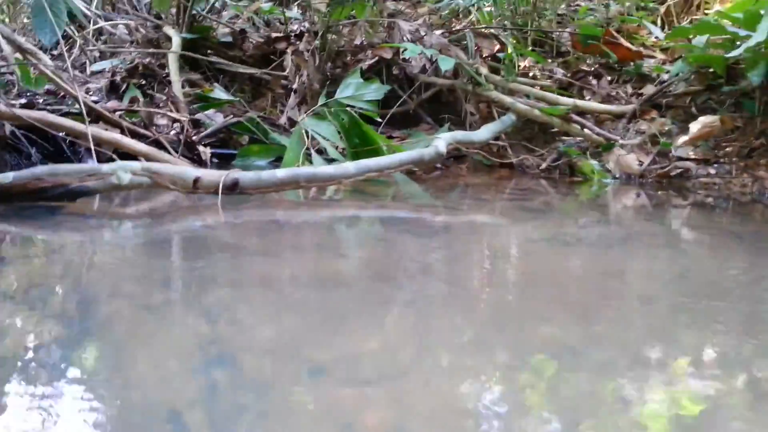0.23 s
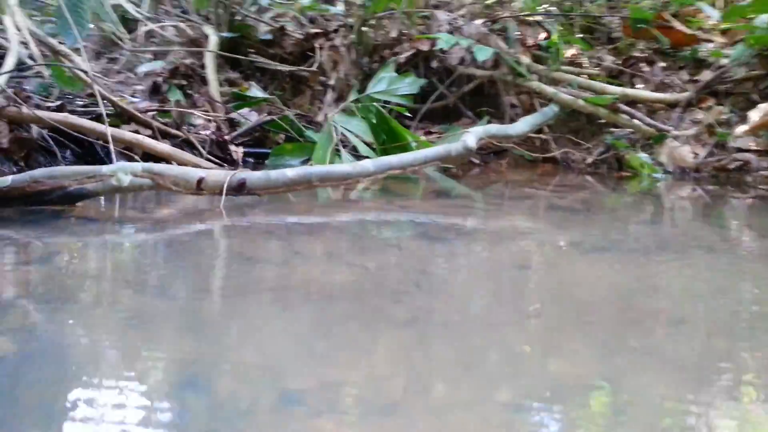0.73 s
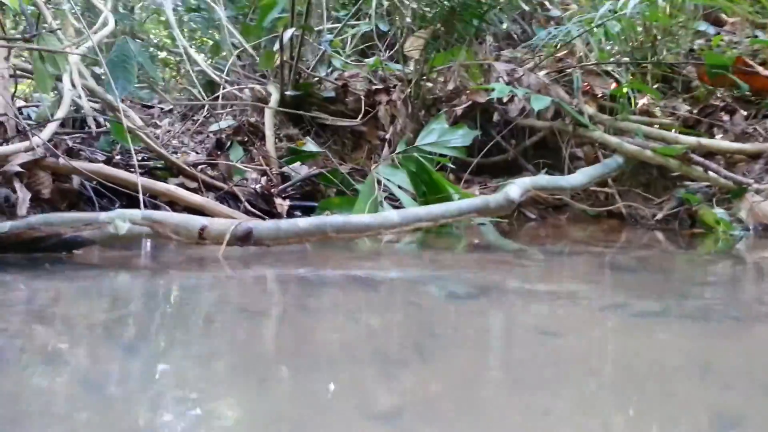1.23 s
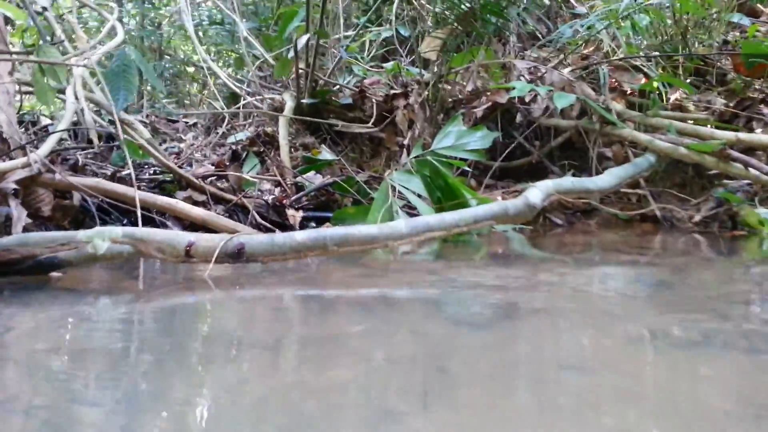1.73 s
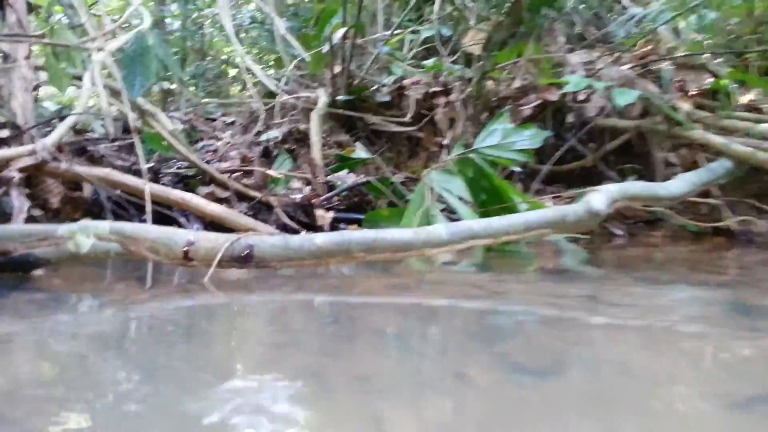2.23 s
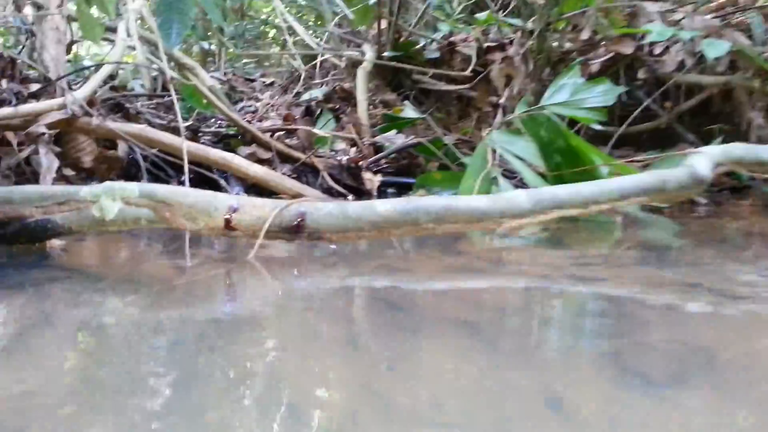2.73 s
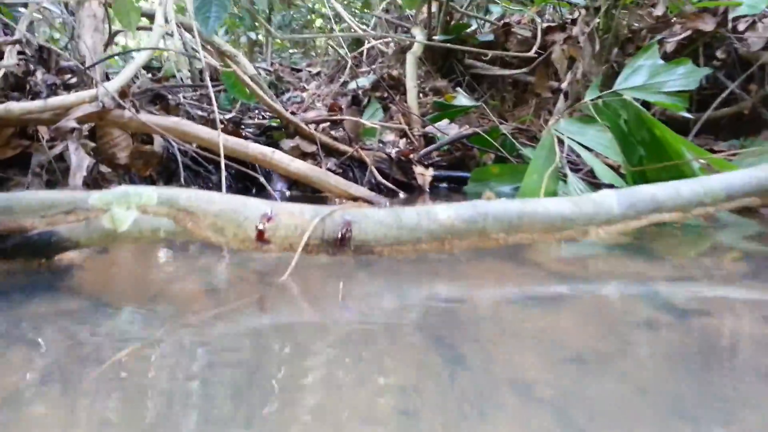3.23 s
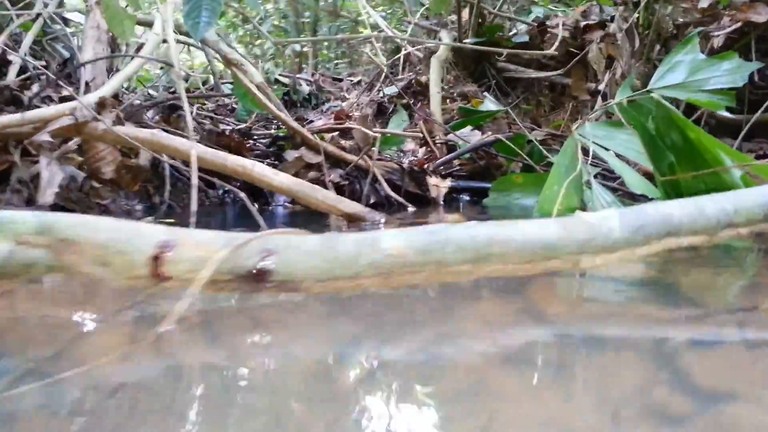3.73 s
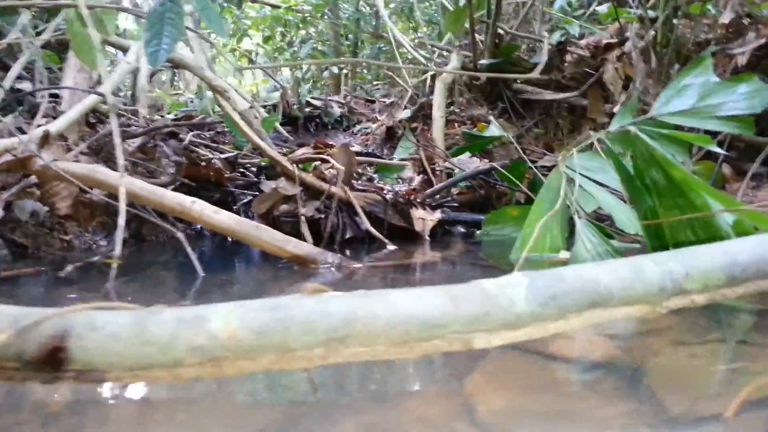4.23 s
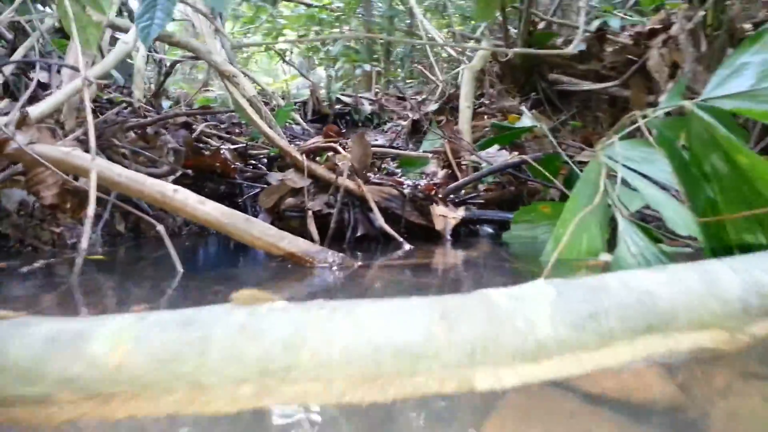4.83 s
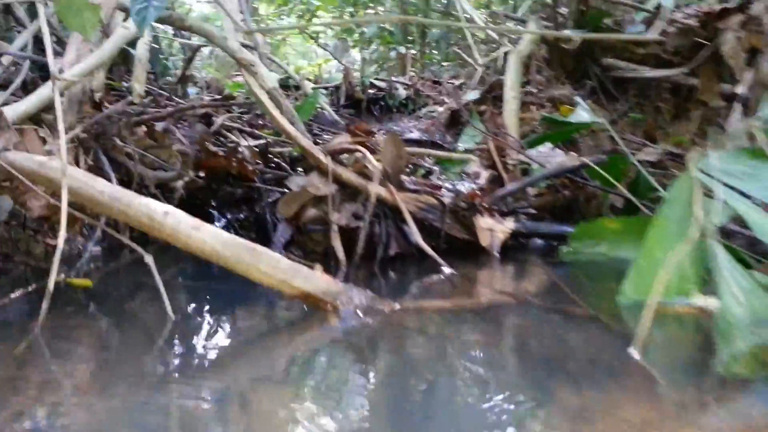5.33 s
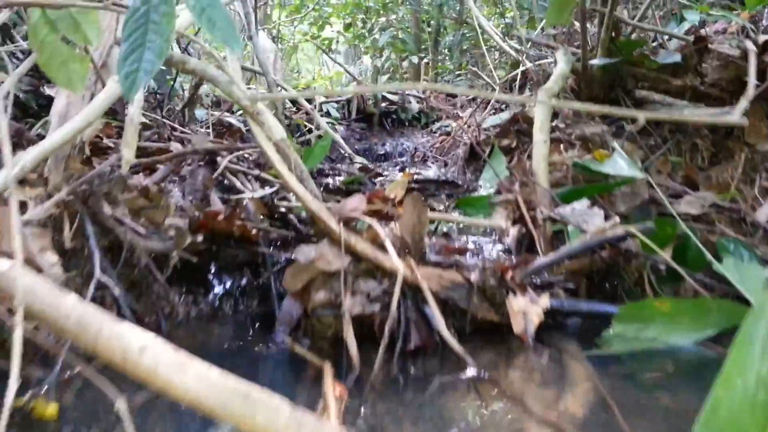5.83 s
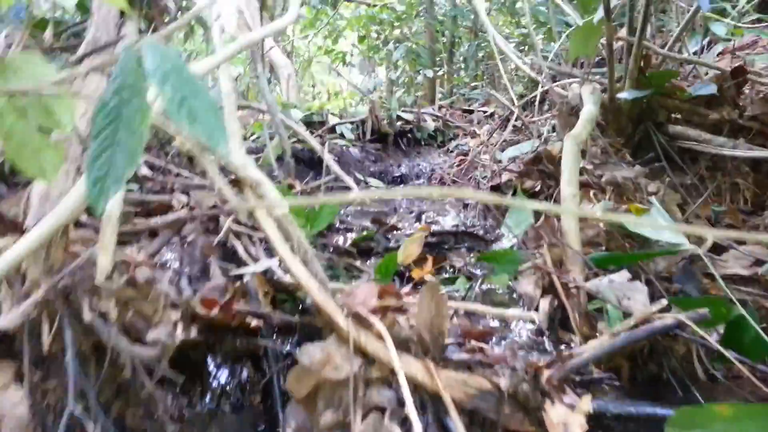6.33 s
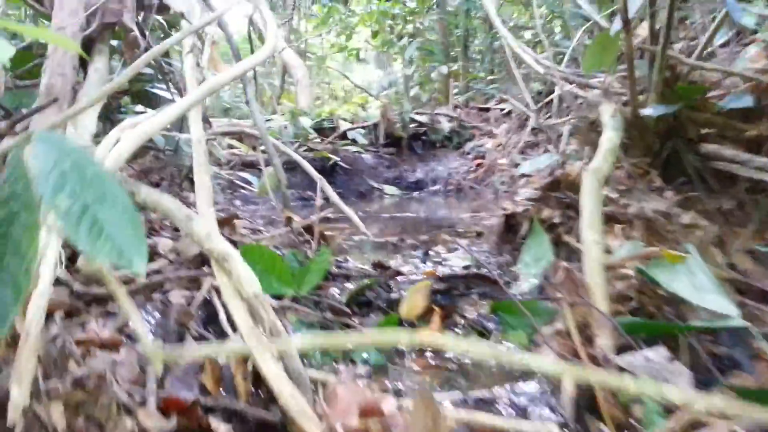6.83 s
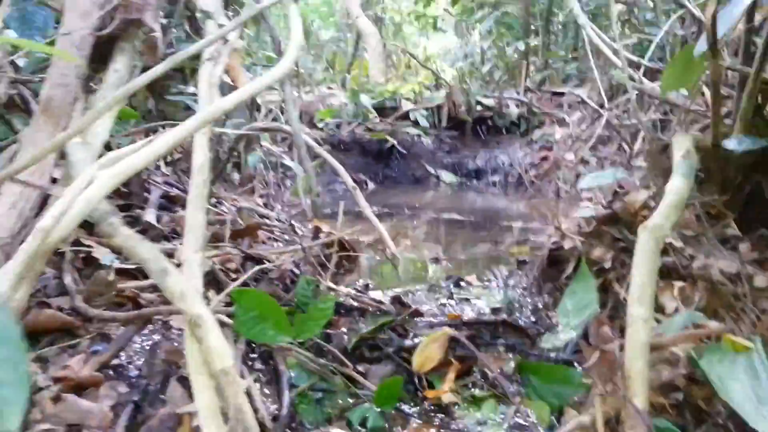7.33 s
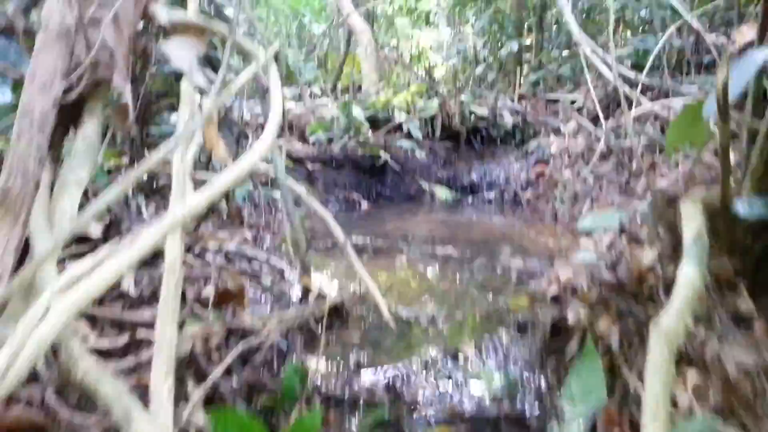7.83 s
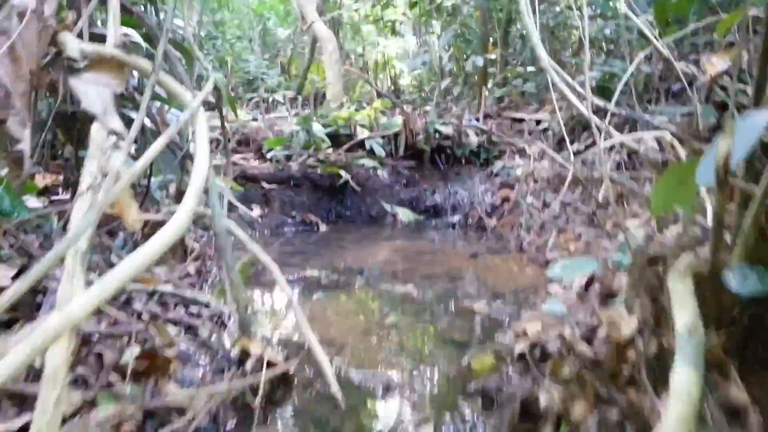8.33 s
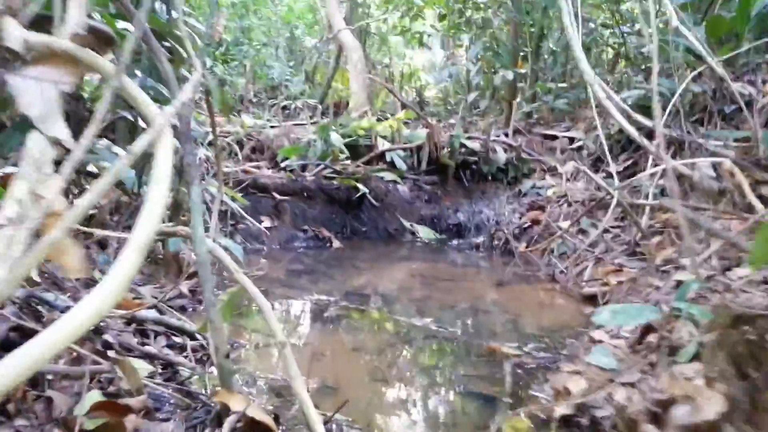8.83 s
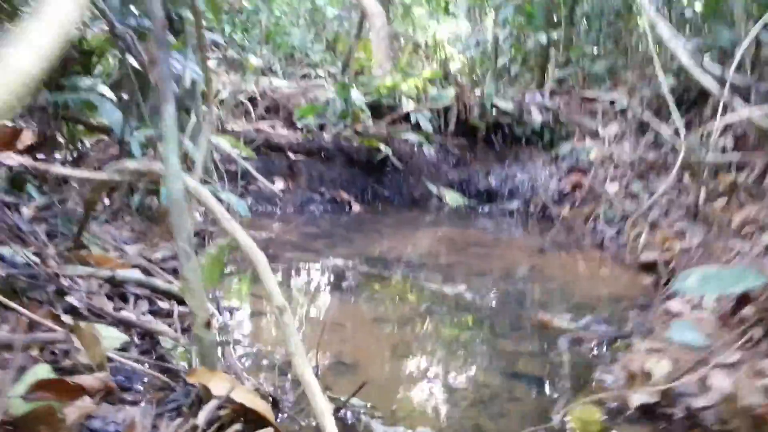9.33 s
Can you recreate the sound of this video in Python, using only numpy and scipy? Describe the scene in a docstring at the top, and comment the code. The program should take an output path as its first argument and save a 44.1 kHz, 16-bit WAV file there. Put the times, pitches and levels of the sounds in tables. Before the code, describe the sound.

Slow wading stirs a shallow forest stream, bubbling gurgles and spattering drops over a thin trickle, calming midway, then growing busier and brighter.

```python
"""A shallow forest stream, stirred about every second and a half as if by slow wading, close to the microphone.
Each stir surges over the steady trickle as a cloud of ringing bubbles with noisy churn, then spray patters back.
Single bubbles plop as gliding rings, drops tick with short bursts, an insect chirps high up in narrow noise.
Soft low knocks, rumble and faint hiss lie beneath.
The right microphone port is open and rings in the treble; the left one is muffled."""
import sys
import numpy as np
from scipy import signal
from scipy.io import wavfile
from scipy.ndimage import uniform_filter1d

SR = 44100
rng = np.random.default_rng(int(sys.argv[2]) if len(sys.argv) > 2 else 0)


def to_wav(s):
    """Save 16-bit WAV."""
    ch = np.atleast_2d(s).T  # columns
    pcm = np.round(np.clip(ch, -1, 1) * 32767)  # PCM
    wavfile.write(sys.argv[1], SR, pcm.astype(np.int16))


N = 423360
TIME = np.arange(N) / SR

# Faint hiss under everything. Each row: time in seconds, level in dB.
HISS_LEVEL = [(0, -65), (2.7, -69), (3.15, -64), (3.6, -69), (4.3, -70.5), (4.65, -63.5), (4.9, -67),
              (5.7, -67), (8.1, -64), (9.6, -61)]
# Tilt of the rumble, the hiss and the spray. Each row: frequency in Hz, relative density in dB per Hz.
RUMBLE_SPECTRUM = [(20, -7), (42, -10), (57, 9.5), (80, 4.5), (120, -1), (220, -4.5), (400, -6),
                   (900, -16.5), (2500, -35)]
HISS_SPECTRUM = [(100, 5.5), (1000, 2.5), (3000, -3.5), (8000, 2), (11000, 1.5), (15000, -3.5)]
SPRAY_SPECTRUM = [(150, -26.5), (600, -3.5), (1500, -4), (2400, -5.5), (3200, -6), (4200, -4), (6000, -3),
                  (9000, -5.5), (11000, -5.5), (14500, -4.5)]
# Responses of the right and the left microphone port. Each row: frequency in Hz, gain in dB.
OPEN_PORT_RESPONSE = [(20, 9), (55, 5), (200, 3), (600, 2), (2000, 5.5), (4500, 7.5), (5800, 9.5),
                      (6700, 14.5), (7500, 20.5), (8200, 18.5), (9000, 12.5), (10000, 8), (15000, -2.5)]
MUFFLED_PORT_RESPONSE = [(20, -45), (55, -7), (200, -0.5), (400, -1.5), (700, -7.5), (1300, -7.5),
                         (2400, -12.5), (3300, -14.5), (5000, -22.5), (8000, -13), (15000, -30)]
# Soft low knocks. Each row: start in seconds, relative peak level in dB, pitch in Hz.
KNOCKS = [(6.614, -53.5, 142), (8.079, -37.5, 91.5), (8.147, -48, 152), (8.292, -42.5, 88),
          (8.35, -63, 111)]
# Bouts of insect chirps. Each row: start in seconds, end in seconds, seconds from chirp to chirp,
# first top pitch in Hz, last top pitch in Hz, relative level in dB.
CHIRP_BOUTS = [(.064, 2.9, .226, 8760, 8510, -57.5), (6.072, 8.5, .208, 8450, 8480, -55.5)]
# Drops that smack the water or the leaves. Each row: start in seconds, relative peak level in dB,
# relative weight of the low thud against the tick in dB.
DROP_HITS = [(0.098, -23, -12), (0.1095, -33, -4.5), (0.2949, -32, 0), (0.4194, -30.5, -10),
             (0.46, -31, -11.5), (0.6416, -32, -15), (0.6797, -25.5, -11), (0.847, -43, 3),
             (1.832, -29.5, -26), (1.872, -30.5, -30), (2.5278, -34.5, -35), (4.558, -32, -31),
             (5.4091, -41.5, -4), (5.7654, -24.5, -32), (6.337, -34, -33), (6.519, -27.5, -43),
             (7.544, -29, -25), (7.6929, -20.5, -11.5), (7.9945, -24, -24), (8.3142, -26.5, -29),
             (8.6257, -29, -12), (8.6652, -23.5, -17), (8.759, -41, -30), (8.781, -31, -28),
             (8.8495, -21.5, -8), (8.9803, -37, 1.5), (9.0171, -15, -32.5), (9.5914, -17.5, -13)]
# Single near bubbles. Each row: start in seconds, relative peak level in dB, nominal pitch in Hz,
# nominal ring time to -60 dB in seconds.
NEAR_BUBBLES = [(.278, -8.5, 252, 0.012), (.279, -31, 2130, 0.011), (.328, -33.5, 1090, 0.022),
                (.403, -24, 3360, 0.003), (.429, -28, 1070, 0.01), (.44, -31.5, 223, 0.069),
                (.676, -29.5, 1800, 0.01), (.713, -27.5, 563, 0.027), (.722, -26.5, 1470, 0.0095),
                (.816, -26, 448, 0.041), (.847, -19.5, 875, 0.011), (.967, -31, 1420, 0.019),
                (.975, -43, 360, .08), (1.442, -39.5, 2700, 0.022), (1.57, -27, 937, 0.044),
                (1.871, -31, 1870, 0.0088), (1.872, -43, 534, 0.068), (2.045, -41, 1740, 0.031),
                (3.031, -35, 930, 0.066), (3.192, -44, 1285, 0.044), (3.377, -42, 322, 0.025),
                (3.717, -42.5, 2250, 0.01), (3.789, -47, 1020, 0.027), (3.985, -52.5, 874, 0.099),
                (4.437, -42.5, 1640, 0.039), (4.555, -37, 845, 0.054), (4.777, -34, 4200, 0.017),
                (5.408, -42, 1980, 0.01), (5.695, -34, 1280, 0.019), (5.752, -29, 854, 0.017),
                (5.867, -24, 1210, 0.014), (6.152, -33, 985, 0.089), (6.302, -24.5, 1980, 0.016),
                (6.475, -42, 1460, 0.031), (7.417, -44, 1900, 0.044), (7.477, -33, 1126, 0.039),
                (7.521, -27.5, 736, 0.018), (7.629, -23, 580, 0.023), (7.658, -28.5, 662, 0.07),
                (7.728, -32.5, 840, .052), (7.739, -24, 1910, 0.0079), (7.781, -29.5, 535, 0.077),
                (8.044, -23, 2080, 0.0062), (8.061, -33.5, 990, 0.022), (8.114, -18.5, 3180, 0.0078),
                (8.827, -4.5, 930, 0.004), (8.981, -27.5, 4400, 0.008)]
# Steady trickle, loudest at the end as it comes nearer.
# Each row: time in seconds, relative bubbling level in dB, relative fine spray level in dB.
TRICKLE_LEVELS = [(0, -73.5, -62.5), (1.2, -77.5, -59.5), (2.3, -72, -61.5), (2.75, -81.5, -67.5),
                  (4.4, -75.5, -67), (5.4, -74.5, -60), (6.3, -75, -55.5), (7.3, -69.5, -52),
                  (8.4, -68.5, -52), (9.6, -58.5, -50)]
# Gurgle pitch of the trickle. Each row: time in seconds, pitch in Hz.
TRICKLE_PITCH = [(0, 610), (5.4, 686), (7.3, 1084), (9.6, 1466)]
# Surges of stirred water. Each row: start in seconds, swell in seconds, hold in seconds,
# relative bubbling level in dB, relative spray level in dB, gurgle pitch at the height in Hz.
STIR_SURGES = [(0.257, 0.02, 0.014, -45.5, -50, 374), (0.352, 0.052, 0.034, -53.5, -48, 334),
               (0.523, .14, .07, -46, -48, 502), (0.774, 0.066, 0.026, -41.5, -46.5, 419),
               (.92, 0.036, 0.026, -51, -49.5, 359), (1.377, 0.18, 0.023, -54, -59, 567),
               (1.777, 0.061, 0.032, -60, -69, 542), (1.924, 0.026, 0.035, -62.5, -50.5, 970),
               (2.879, 0.06, 0.13, -59.5, -56, 830), (3.147, 0.04, 0.049, -57, -54, 834),
               (3.273, 0.064, 0.064, -60, -56, 312), (3.611, .05, 0.12, -68, -60.5, 345),
               (3.926, 0.065, 0.029, -70.5, -63, 323), (4.391, 0.17, .26, -56.5, -52.5, 757),
               (5.538, 0.13, 0.21, -48.5, -48.5, 545), (5.889, 0.0813, 0.2, -53.5, -49.5, 710),
               (6.236, 0.044, 0.082, -60.5, -55, 1230), (7.38, 0.081, 0.066, -52, -52.5, 855),
               (7.52, 0.095, 0.18, -42, -43, 551), (7.798, 0.082, 0.029, -46, -38.5, 605),
               (7.937, 0.13, 0.071, -49.5, -36.5, 1716), (8.147, 0.052, 0.15, -63, -43.5, 1500),
               (8.447, 0.15, .25, -50.5, -41, 731), (8.921, 0.046, 0.052, -51.5, -49.5, 842),
               (9.308, 0.22, .05, -53, -46.5, 1260)]
# Brief showers of fine spray. Each row: start in seconds, length in seconds, relative level in dB.
SPRAY_SHOWERS = [(0.996, 0.19, -61), (1.213, 0.44, -68), (1.688, 0.13, -57.5), (2.138, 0.19, -60.5),
                 (2.336, 0.14, -56.5), (2.488, 0.22, -57), (2.79, 0.11, -59.5), (3.076, 0.074, -54),
                 (3.972, 0.059, -55), (4.132, 0.089, -55.5), (4.282, 0.046, -54.5), (4.966, 0.16, -55.5),
                 (5.142, 0.19, -58.5), (5.34, 0.1, -56.5), (6.49, 0.094, -53), (7.648, 0.21, -38),
                 (9.101, 0.13, -45)]

EDGE_HZ = 14750  # upper band limit
RUMBLE_DB, RUMBLE_PER_DB = -44.5, 0.43  # the rumble follows the bubbling, more weakly
CHIRP_S = 0.167  # length of one chirp
DROP_HZ, DROP_SPREAD_OCTAVES = 7430, 0.072  # the tiny bubble that a drop traps
SWELL_DB, SETTLE_DB_PER_S, SPRAY_SETTLE_DB_PER_S = 14, 167.5, 138  # the spray lingers after the bubbling
DEEPEN_OCTAVES_PER_DB = 0.15  # a surge gurgles lowest at its height


def amp(db):
    """Turns decibels into gain."""
    return 10 ** (np.asarray(db) / 20)


def unit(x):
    """Scales a sound to rms 1."""
    return x / np.sqrt(np.mean(x ** 2) + 1e-20)


def follow(rows, column=1):
    """Draws one column of a curve at every sample."""
    rows = np.asarray(rows)
    return np.interp(TIME, rows[:, 0], rows[:, column])


def add(mix, start_s, sound):
    """Mixes a sound in at its start time, cut off at the end of the scene."""
    part = mix[max(round(start_s * SR), 0):][:len(sound)]
    part += sound[:len(part)]


def colour(x, points):
    """Filters with a (Hz, dB) response, in minimum phase so that nothing sounds early."""
    hz, db = np.transpose(points)
    bins_hz = abs(np.fft.fftfreq(8192, 1 / SR))
    log_gain = np.log(amp(np.interp(np.log(bins_hz + 1), np.log(hz), db)))
    response = np.exp(np.conj(signal.hilbert(log_gain)))
    taps = np.fft.ifft(response).real[:4096]
    return signal.oaconvolve(x, taps)[:len(x)]


def steadied(x, seconds):
    """Holds the slow level of a stream of grains near 1 and leaves the single grains standing out."""
    size = int(seconds * SR)
    power = uniform_filter1d(uniform_filter1d(x ** 2, size), size)
    return x / np.sqrt(abs(power) + 1e-9)


def resonate(x, hz, width_hz):
    """A resonance that follows the curve hz: shift it down to zero, smooth, and shift back up."""
    turn = np.exp(2j * np.pi * np.cumsum(hz) / SR)
    r = np.exp(-np.pi * width_hz / SR)
    smooth = signal.lfilter([1 - r], [1, -r], x / turn + 1e-18)
    return 2 * (turn * smooth).real


def bubble(hz, t60, rise):
    """A pocket of air swells into a ring within a cycle or two and dies; its pitch glides by the share rise."""
    t = np.arange(int(t60 * SR)) / SR
    turns = hz * (t + rise * t ** 2 / (2 * t60))
    swell = 1 - np.exp(-(hz * t) ** 2)
    return np.sin(2 * np.pi * turns) * swell * np.exp(-np.log(1000) * t / t60)


def splashes(per_s, size_db, decay_s, base):
    """Envelope of tiny splashes: each starts at once and dies away, over a steady base."""
    chance, size = rng.random((2, N))
    energy = (chance < per_s / SR) * amp(size_db * np.minimum(-np.log(1 - size), 3)) ** 2
    power = signal.lfilter([1], [1, -np.exp(-1 / (decay_s * SR))], energy)
    return np.sqrt(power / power.mean() + base)


def bed(spectrum, level_db, shared):
    """Soft noise on a level curve; the power share `shared` is alike at both ports."""
    common, left, right = (unit(colour(rng.standard_normal(N), spectrum)) for _ in range(3))
    noise = np.sqrt(shared) * common + np.sqrt(1 - shared) * np.array([left, right])
    return noise * amp(level_db)


def bumps(t60=0.08):
    """Dull low knocks, felt at both ports, each a short ring of fixed pitch."""
    out = np.zeros(N)
    for start_s, db, hz in KNOCKS:
        add(out, start_s, amp(db) * bubble(hz, t60, 0))
    return out


def insect(level_db=-12.5, arch_hz=110):
    """Bouts of evenly spaced rasping chirps: narrow noise on a carrier that arches slightly in pitch."""
    out = np.zeros(N)
    t = np.arange(int(CHIRP_S * SR)) / SR
    narrow = signal.butter(2, 130, fs=SR, output="sos")
    for start, end, every, first_hz, last_hz, db in CHIRP_BOUTS:
        for start_s in np.arange(start, end, every):
            top_hz = np.interp(start_s, [start, end], [first_hz, last_hz])
            rasp = signal.sosfilt(narrow, rng.standard_normal((len(t), 2)) @ [1, 1j])
            arch = arch_hz * (np.sin(np.pi * t / CHIRP_S) - 1)
            turns = np.cumsum(top_hz + arch) / SR
            chirp = unit((rasp * np.exp(2j * np.pi * turns)).real)
            add(out, start_s, amp(db + level_db) * chirp * signal.windows.tukey(len(t), .5))
    return out


def drops(level_db=-8, burst_db=-10, patter_db=-25, patter_s=0.045,
          thud_db=3, thud_s=0.0058, ring_s=0.0045, ring_db=-7):
    """Each drop cracks with a brief burst, rings a tiny bubble, thuds dully and throws a short patter."""
    out = np.zeros(N)
    t = np.arange(SR // 12) / SR
    dull = signal.butter(2, [250, 3000], "band", fs=SR)
    for start_s, db, low_db in DROP_HITS:
        hz = DROP_HZ * 2 ** (DROP_SPREAD_OCTAVES * rng.standard_normal())
        noise, thud_noise = rng.standard_normal((2, len(t)))
        crack = np.sin(2 * np.pi * hz * t) * np.exp(-hz * t) * 2
        burst = amp(burst_db) * np.exp(-t / .0022)
        patter = amp(patter_db) * np.exp(-t / patter_s)
        thud = unit(signal.lfilter(*dull, thud_noise)) * np.exp(-t / thud_s)
        hit = crack + noise * (burst + patter) + amp(low_db + thud_db) * thud
        add(out, start_s, amp(db + level_db) * hit)
        add(out, start_s, amp(db + level_db + ring_db) * bubble(hz, ring_s, 0.045))
    return out


def droplets(count, size_db, cycles):
    """Tiny bubbles between 2 and 13 kHz, each with its own pitch, size and short ring."""
    when, size, pitch, ring, sign = rng.random((5, count, 1))
    t = np.arange(440) / SR
    hz = 2000 + 11000 * pitch ** 1.3  # more of them low than high
    t60 = cycles * 2 ** (2 * ring - 1) / hz
    gain = amp(size_db * np.minimum(-np.log(1 - size), 4)) * np.sign(sign - .5)
    gain = gain * np.sqrt(hz / t60)  # shorter and higher rings strike harder
    onset = np.minimum(hz * t / 2, 1)  # two cycles
    rings = gain * np.sin(2 * np.pi * hz * t) * onset * np.exp(-np.log(1000) * t / t60)
    places = (when * N).astype(int) + np.arange(t.size)
    return unit(np.bincount(places.ravel(), rings.ravel(), N)[:N])


def spray(spray_db, tinkle_db=-4, level_db=-4.5):
    """Tiny splashes of fine mist, with droplets tinkling among them."""
    mist = rng.standard_normal(N) * splashes(per_s=55, size_db=5.5, decay_s=0.0088, base=0.49)
    tinkle = droplets(count=11000, size_db=3.6, cycles=48)
    out = colour(unit(mist) + amp(tinkle_db) * tinkle, SPRAY_SPECTRUM)
    return steadied(out, 0.079) * amp(spray_db + level_db)


def plops(level_db=1, ring=0.97, rise=0.36, turning_hz=420):
    """The near bubbles, each heard by itself: small ones chirp upward, large pockets sag as they open."""
    out = np.zeros(N)
    for start_s, db, hz, t60 in NEAR_BUBBLES:
        glide = rise * np.tanh(2 * np.log2(hz / turning_hz))
        start_hz = hz * (1 - glide / 8)
        add(out, start_s, amp(db + level_db) * bubble(start_hz, t60 * ring, glide))
    return out


def lumps(per_s):
    """Slow random wavering of rms 1."""
    knots = rng.standard_normal(2000)
    return unit(np.interp(TIME * per_s, np.arange(len(knots)), knots))


def stirring(lump_db=1.74, spray_lump_db=1.42, lumps_per_s=26):
    """Adds the power of surges and showers to the trickle: bubbling dB, spray dB and gurgle Hz per sample."""
    step = 32  # the curves are drawn at every 32nd sample
    t = TIME[::step]
    bubbling = amp(follow(TRICKLE_LEVELS)[::step]) ** 2
    mist = amp(follow(TRICKLE_LEVELS, column=2)[::step]) ** 2
    octaves = bubbling * np.log2(follow(TRICKLE_PITCH)[::step])  # pitch weighted by power
    for start, swell, hold, bubbling_db, spray_db, hz in STIR_SURGES:
        begun = t > start
        rise_db = SWELL_DB * (np.clip((t - start) / swell, 0, 1) - 1)
        after = np.maximum(t - start - swell - hold, 0)
        shape_db = rise_db - SETTLE_DB_PER_S * after
        power = begun * amp(bubbling_db + shape_db) ** 2
        bubbling = bubbling + power
        octaves = octaves + power * (np.log2(hz) - DEEPEN_OCTAVES_PER_DB * shape_db)
        mist = mist + begun * amp(spray_db + rise_db - SPRAY_SETTLE_DB_PER_S * after) ** 2
    for start, length, db in SPRAY_SHOWERS:
        arch = np.sin(np.pi * np.clip((t - start) / length, 0, 1))
        mist = mist + amp(db) ** 2 * arch ** 2
    stir_db = np.interp(TIME, t, 10 * np.log10(bubbling))
    spray_db = np.interp(TIME, t, 10 * np.log10(mist))
    gurgle_hz = np.interp(TIME, t, 2 ** (octaves / bubbling))
    uneven = lumps(lumps_per_s)
    return stir_db + lump_db * uneven, spray_db + spray_lump_db * uneven, gurgle_hz


def churn(gurgle_hz, width_hz=300, froth_db=-1):
    """Bubbles too many to tell apart: a noisy ring just above the gurgle pitch, with froth above it."""
    grains = splashes(per_s=75, size_db=-2.5, decay_s=0.0047, base=0.059)
    ring, froth = rng.standard_normal((2, N)) * grains
    centre = gurgle_hz * 1.144
    ring = resonate(resonate(ring, centre, width_hz), centre, width_hz)
    froth = signal.lfilter(*signal.butter(2, [900, 2800], "band", fs=SR), froth)
    return unit(unit(ring) + amp(froth_db) * unit(froth))


def slosh(stir_db, gurgle_hz, spread=0.488, small_share=.48, small_octaves=1.4, small_spread=0.554,
          size_db=6.5, ring_s=0.039, rise=0.22, churn_db=-8, full_db=-43):
    """A cloud of bubbles: large ones around the gurgle pitch, smaller ones mostly well above it, over churn."""
    cloud = np.zeros(N)
    count = 9000  # candidates, thinned out below
    density = amp((stir_db - full_db) / 2)  # calm water holds fewer bubbles
    chances, offsets = rng.random((count, 6)), rng.standard_normal(count)
    for (when, kind, size, ring, climb, born), offset in zip(chances, offsets):
        place = int(when * N)
        if born > density[place]:
            continue
        if kind < small_share:
            octaves = small_octaves + small_spread * offset
        else:
            octaves = spread * max(offset, offset / 2)  # few pockets grow much larger than the usual one
        hz = min(gurgle_hz[place] * 2 ** octaves, SR / 4)
        t60 = ring_s * (.5 + ring) * np.sqrt(1000 / hz)  # small bubbles die sooner
        db = size_db * min(-np.log(1 - size), 4)
        add(cloud, when * N / SR, amp(db) * bubble(hz, t60, 2 * rise * climb))
    mixed = steadied(cloud, .06) + amp(churn_db) * churn(gurgle_hz)
    return steadied(mixed, .03) * amp(stir_db)


def banks(x, t60=0.11, wet_db=-10, dull_hz=3500):
    """The banks and the undergrowth scatter a short, dull echo of sparse random reflections."""
    t = np.arange(SR // 3) / SR
    sparse = (rng.random(len(t)) < .06) * (t > .002)
    taps = rng.standard_normal(len(t)) * sparse * np.exp(-np.log(1000) * t / t60)
    taps = signal.lfilter(*signal.butter(1, dull_hz, fs=SR), taps / np.linalg.norm(taps))
    return x + amp(wet_db) * signal.oaconvolve(x, taps)[:N]


def scene(lag_s=0.00024):
    """Water with a separate echo per port, and the dry insect, reach the left port late; rumble and hiss join."""
    stir_db, spray_db, gurgle_hz = stirring()
    chirps = insect()
    water = drops() + spray(spray_db) + plops() + slosh(stir_db, gurgle_hz)
    left = colour(banks(water) + chirps, MUFFLED_PORT_RESPONSE)
    left = np.interp(TIME - lag_s, TIME, left)
    right = colour(banks(water) + chirps, OPEN_PORT_RESPONSE)
    rumble = bed(RUMBLE_SPECTRUM, RUMBLE_DB + RUMBLE_PER_DB * stir_db, shared=0.58)
    lows = amp([[2], [-2]]) * (rumble + bumps())  # the lows lean to the left
    return np.array([left, right]) + lows + bed(HISS_SPECTRUM, follow(HISS_LEVEL), shared=0.1)


def record(dry):
    """Limits the band with a steep lowpass at EDGE_HZ."""
    lowpass = signal.firwin(301, EDGE_HZ, window=("kaiser", 8), fs=SR)
    return signal.oaconvolve(dry, lowpass[None], "same")


dry = scene()
out = record(dry)
to_wav(out)
```